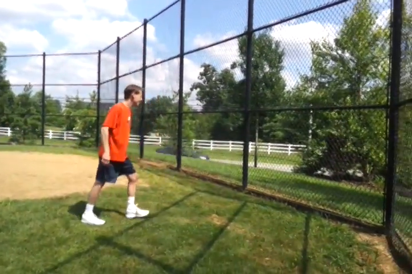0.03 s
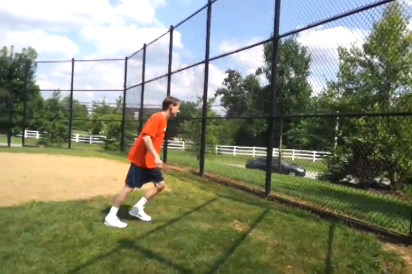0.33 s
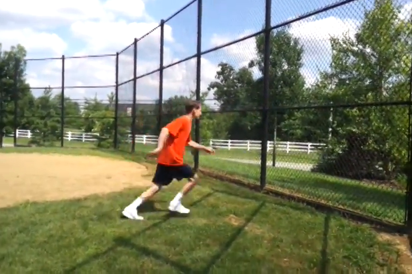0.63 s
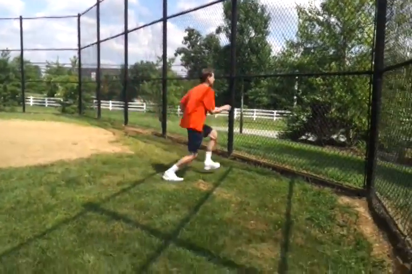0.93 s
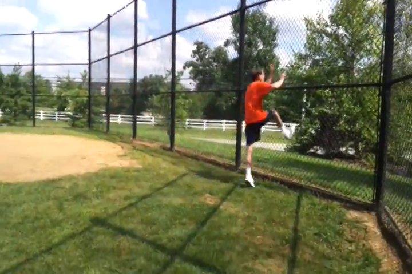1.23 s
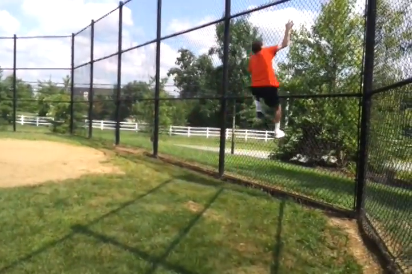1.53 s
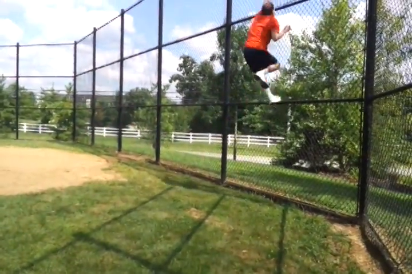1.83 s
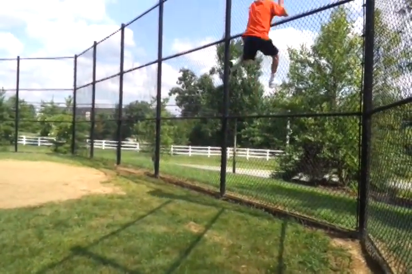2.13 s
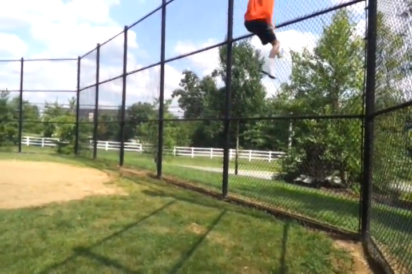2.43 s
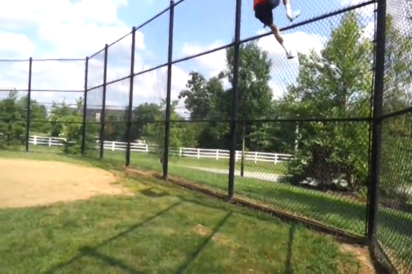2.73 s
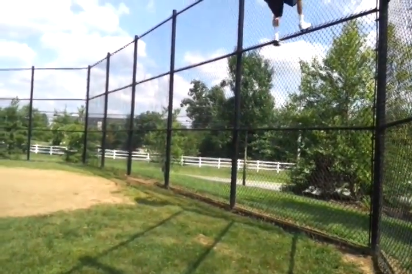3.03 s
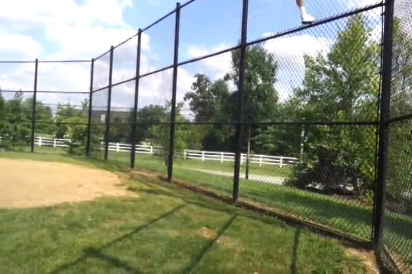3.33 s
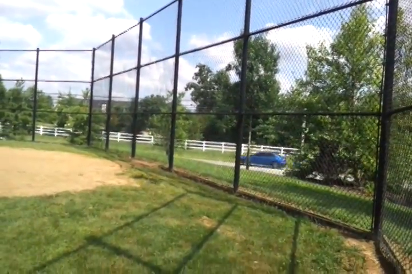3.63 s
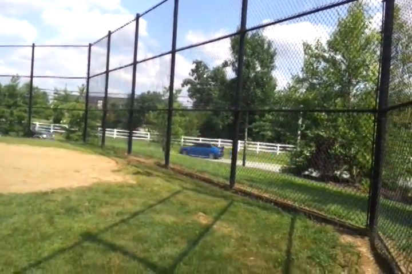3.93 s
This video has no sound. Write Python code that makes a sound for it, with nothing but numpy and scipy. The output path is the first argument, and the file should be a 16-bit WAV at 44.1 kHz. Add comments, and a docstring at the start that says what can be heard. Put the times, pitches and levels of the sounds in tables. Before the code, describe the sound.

A chain-link fence rattles and clinks as someone climbs it, with cars passing behind.

```python
"""Climbing a chain-link fence

Someone runs over grass and climbs a tall chain-link fence: each hold shakes the mesh, whose wires
clatter, clink and ring. Cars pass on the road behind, one with a low engine drone, and distant
traffic hums throughout. A few dry clicks, a faint ticking and a low rumble sound close to the
hand-held mono microphone."""
import sys
import numpy as np
from scipy import signal
from scipy.fft import rfft, irfft, next_fast_len
from scipy.io import wavfile
from scipy.ndimage import map_coordinates

SR = 44100
rng = np.random.default_rng(int(sys.argv[2]) if len(sys.argv) > 2 else 0)


def wrap_up_sound(samples):
    """Save the sound to the file named by the first command line argument, as 16-bit audio."""
    columns = np.atleast_2d(samples).T
    # keep every value between -1 and 1, then stretch to whole-number steps
    tamed = np.clip(columns, -1, 1)
    steps = np.round(tamed * 32767).astype(np.int16)
    wavfile.write(sys.argv[1], SR, steps)


N = 176400
T = np.arange(N) / SR


def amp(db):
    """Decibels to gain."""
    return 10 ** (np.asarray(db) / 20)


def unit(x):
    """Scale to rms 1."""
    return x / np.sqrt(np.mean(x ** 2) + 1e-20)


def curves(rows):
    """One automation curve for each column after the time."""
    times, *columns = np.transpose(rows)
    return [np.interp(T, times, column) for column in columns]


def wobble(rate):
    """A smooth random curve, rate knots a second."""
    return map_coordinates(rng.standard_normal(400), [T * rate], mode="mirror")


def colour(x, spectrum):
    """Minimum-phase EQ through (freq_hz, gain_db) points."""
    size = 2 * next_fast_len(len(x))
    hz, db = np.transpose(spectrum)
    gain_db = np.interp(np.log(np.fft.rfftfreq(size, 1 / SR) + 1), np.log(hz), db)
    cepstrum = irfft(np.log(amp(gain_db)))
    cepstrum[1:size // 2] *= 2  # folded so that nothing rings ahead of an attack
    cepstrum[size // 2 + 1:] = 0
    return irfft(rfft(x, size) * np.exp(rfft(cepstrum)))[:len(x)]


def noise(spectrum):
    """Coloured noise of rms 1."""
    return unit(colour(rng.standard_normal(N), spectrum))


def fade(t60):
    """A third of a second of exponential decay."""
    return np.exp(-np.log(1000) * T[:SR // 3] / t60)


def burst(spectrum, t60):
    """A dying burst of coloured noise; energy 1."""
    decay = fade(t60)
    x = colour(decay * rng.standard_normal(len(decay)), spectrum)
    return x / np.linalg.norm(x)


def impact(spectrum, t60, scatter=.55):
    """One sharp contact with a short scattered tail, coloured; energy 1."""
    tail = fade(t60) * rng.standard_normal(SR // 3)
    x = colour(signal.unit_impulse(len(tail)) + scatter * tail / np.linalg.norm(tail), spectrum)
    return x / np.linalg.norm(x)


def contacts(per_s, spread_db=2.5):
    """Random impulses of uneven size, rms 1."""
    hits = (rng.random(N) < per_s / SR) * rng.choice([-1, 1], N)
    return unit(hits * amp(spread_db * rng.standard_normal(N)))


def add(out, start_s, x):
    """Mix x in at start_s."""
    part = out[round(start_s * SR):][:len(x)]
    part += x[:len(part)]


def traffic():
    """Distant traffic blends into a low, gently swelling hum."""
    # swell of the hum: time_s, level_db
    swell = [(0, -35.5), (1.0, -36.5), (1.85, -33.5), (2.7, -36), (4, -35.5)]
    # tone of the hum: freq_hz, gain_db
    hum_eq = [(20, -14.5), (45, -6), (75, 1), (130, -2), (180, -3), (228, 0), (300, -5.5), (450, -9.5),
              (600, -16.5), (900, -10.5), (1300, -15.5), (2000, -22.5), (3500, -26), (5000, -39),
              (6500, -42), (8000, -81.5)]
    return amp(curves(swell)[0] + 0.11 * wobble(5.0)) * noise(hum_eq)


def tyres():
    """Tyres roar on the road, brightening as a car comes near."""
    # pass-by levels of the two bands: time_s, low_db, high_db
    pass_by = [(0, -51.5, -53), (.85, -57, -48), (1.1, -47.5, -43), (1.23, -36.5, -43.5),
               (1.48, -38, -39.5), (1.65, -38, -38.5), (1.95, -38.5, -36.5), (2.25, -36.5, -33.5),
               (2.45, -38.5, -34), (2.7, -42, -41.5), (3.0, -45, -45.5), (3.3, -56, -47.5), (4, -42, -46.5)]
    # body of the roar: freq_hz, gain_db
    low_eq = [(200, -19), (400, 0.5), (600, -13.5), (780, 4.5), (950, 13.5), (1300, 6.5), (1800, 0.5),
              (2600, -46)]
    # hiss of the tread: freq_hz, gain_db
    high_eq = [(700, -19.5), (1200, -2.5), (1650, -7), (2100, -5.5), (2600, -14.5), (3400, -15.5),
               (5000, -22.5), (7500, -44.5)]
    low_db, high_db = curves(pass_by)
    return amp(0.41 * wobble(12)) * (amp(low_db) * noise(low_eq) + amp(high_db) * noise(high_eq))


def engine(waver_db=1):
    """An approaching car drones on one low note, the firing rate of its engine."""
    # course of the drone: time_s, firing_hz, level_db
    drone = [(0, 70.5, -47), (1, 69, -53.5), (1.35, 69.1, -41.5), (1.6, 70.2, -48), (2, 69.6, -42),
             (2.3, 68.75, -36), (2.55, 68.4, -38.5), (2.8, 68.8, -33.5), (3.2, 67.4, -33),
             (3.65, 66, -31.5), (4, 65.7, -33.5)]
    hz, db = curves(drone)
    return np.sqrt(2) * amp(db + waver_db * wobble(24)) * np.sin(2 * np.pi * np.cumsum(hz) / SR)


def rumble(fade_s=0.0066):
    """Lumpy low rumble that comes and goes at the microphone."""
    # stretches of rumble: start_s, end_s, level_db
    stretches = [(0.125, 0.162, -33), (0.418, 0.524, -32.5), (0.533, 0.687, -32.5), (0.702, 0.918, -36.5),
                 (1.886, 1.939, -34.5)]
    # tone of the rumble: freq_hz, gain_db
    rumble_eq = [(25, -12.5), (90, 5), (170, 0.5), (230, 7.5), (330, -7.5), (480, -11.5), (800, -57.5)]
    gate = sum(amp(db) * np.clip(np.minimum(T - start, end - T) / fade_s + .5, 0, 1)
               for start, end, db in stretches)
    return gate * unit(noise(rumble_eq) * amp(.5 * wobble(28.86)))


def ticking():
    """Tiny dry ticks of uneven strength."""
    # tick cues: start_s, level_db
    ticks = [(.018, -27), (.211, -27), (.289, -24.5), (.355, -24.5), (.421, -26), (.488, -23), (.555, -27),
             (0.622, -25), (0.752, -22.5), (.788, -25), (1.175, -21.5), (1.344, -17), (1.67, -22),
             (3.316, -23.5), (3.349, -22.5)]
    # thin, bright tone of a tick: freq_hz, gain_db
    tick_eq = [(2000, -16), (3000, -5), (3900, 0), (5000, -10), (7000, -28)]
    tick = colour(signal.unit_impulse(SR // 20), tick_eq)
    out = np.zeros(N)
    for start_s, db in ticks:
        add(out, start_s, amp(db) * tick / np.linalg.norm(tick))
    return out


def clicks(second_contact_s=.0038, thud_lag_s=.0008):
    """Dry double clicks, each contact a snap over a knock, with a dull thud just behind."""
    # click cues: start_s, snap_db, knock_db, thud_db, second_contact_relative_db
    cues = [(0.8773, -5.5, -35, -3.5, -20), (0.9048, -13, -13.5, -35, -9), (1.9662, -11.5, -26, -19, -15),
            (3.3872, -8.5, -5, -16, -3.5), (3.8334, -9.5, -6, -3, -5), (3.9838, -11.5, -9, -15, -4)]
    # bright snap: freq_hz, gain_db
    snap_eq = [(1500, -29), (2300, -14), (2700, -1), (3100, -0.5), (3650, 9), (4200, 2), (4750, 2.5),
               (5300, -18), (5900, -11), (8000, -25)]
    # midrange knock: freq_hz, gain_db
    knock_eq = [(250, -10), (480, 2), (780, 4), (1100, -4), (1600, -4), (2200, -1.5), (3200, -13),
                (6000, -44)]
    # low thud: freq_hz, gain_db
    thud_eq = [(30, -13), (100, -3.5), (250, 1.5), (450, -4.5), (1000, -25), (3000, -49)]
    out = np.zeros(N)
    for start_s, snap_db, knock_db, thud_db, second_db in cues:
        for contact_s, drop_db in (start_s, 0), (start_s + second_contact_s, second_db):
            snap = amp(snap_db + drop_db) * impact(snap_eq, t60=.0074)
            knock = amp(knock_db + drop_db) * impact(knock_eq, t60=.02)
            thud = amp(thud_db + drop_db) * impact(thud_eq, t60=.02)
            add(out, contact_s, snap + knock)
            add(out, contact_s + thud_lag_s, thud)
    return out


def grass_steps():
    """Short crisp swishes: many blades of grass snap past the shoes."""
    # shoes brushing the grass: centre_s, level_db, width_s
    swishes = [(0.961, -53, 0.042), (1.064, -47, 0.0092), (1.093, -39.5, 0.0089), (1.102, -37.5, 0.0024)]
    # tone of the blades: freq_hz, gain_db
    grass_eq = [(800, -23), (2300, -3), (2850, 1), (3500, -4), (5000, -9), (6500, -13.5), (7500, -19)]
    blades = unit(colour(contacts(per_s=1500), grass_eq))
    return blades * sum(amp(db) * np.exp(-.5 * ((T - centre) / width) ** 2)
                        for centre, db, width in swishes)


def clinks():
    """Single wires and loose fittings strike the rails, each with one clear note."""
    # strikes on the rails: start_s, level_db, pitch_hz, t60_s
    strikes = [(1.372, -40.5, 3235, 0.28), (1.378, -44, 4590, 0.18), (1.80, -44, 3290, .3),
               (1.966, -29, 3950, .03), (2.16, -46, 4600, 0.18), (2.499, -22, 3237, 0.07),
               (2.507, -28, 3220, 0.06), (2.525, -25, 3250, 0.073), (2.544, -37, 4580, 0.27),
               (2.925, -30.5, 3520, 0.095), (2.929, -30.5, 5740, 0.053), (2.945, -37, 4690, 0.17),
               (2.993, -28, 4660, 0.076), (2.997, -32, 5440, 0.045), (3.112, -34.5, 5020, .06),
               (3.221, -38.5, 4550, .1), (3.510, -31.5, 5000, 0.062), (3.539, -30.5, 4720, 0.042),
               (3.548, -37, 4000, 0.029)]
    out = np.zeros(N)
    for start_s, db, hz, t60 in strikes:
        decay = fade(t60)
        note = np.sin(2 * np.pi * hz * rng.normal(1, 0.0022) * T[:len(decay)])
        add(out, start_s, amp(db) * decay * note)
    return out


def wire_ring(t60=.29, detune=.0023):
    """The ring of one patch of mesh, slightly out of tune with the others; energy 1."""
    # modes of the wires: pitch_hz
    mode_hz = [1712, 1978, 2146, 3245, 3508, 3660, 4020, 4377, 4581, 4650, 4802, 4981, 5190, 5648, 5803]
    # balance of those modes: level_db
    mode_db = [-7, -1, -3, 2, -2, -4, -4, -6, 4, 3, -2, 0, -6, -8, -9]
    decay = fade(t60)
    t = T[:len(decay)]
    ring = np.zeros(len(t))
    for hz, db in zip(mode_hz, mode_db):
        gain = amp(db + rng.normal(0, 1.2))
        cycles = hz * rng.normal(1, detune) * t + rng.random()
        ring += gain * decay * np.sin(2 * np.pi * cycles)
    return ring / np.linalg.norm(ring)


def fence(patches=7, contacts_per_s=1400, rise_s=.011, ring_db=-3, jingle_ring_db=-3):
    """Each shake sets off a dying swarm of wire contacts that clash, ring and rattle the frame."""
    # shakes of the mesh: start_s, level_db, decay_s, frame_relative_db
    shakes = [(1.368, -41, 0.03, 2), (1.49, -50, 0.026, -7), (1.66, -54, 0.0095, -2),
              (1.80, -47, 0.039, 11), (2.143, -34.5, .04, 2.5), (2.184, -47, 0.037, 11),
              (2.386, -43, 0.026, 3), (2.478, -35.5, .01, 2), (2.487, -30, 0.016, 3),
              (2.522, -34, 0.046, 3), (2.621, -32.5, 0.005, 0), (2.697, -40.5, 0.0091, -0.5),
              (2.845, -45.5, 0.086, 4.5), (2.915, -29, 0.023, -3), (2.983, -33.5, 0.016, -8),
              (3.041, -46.5, .025, 6), (3.099, -39.5, 0.016, 1), (3.21, -45.5, 0.0083, 1),
              (3.429, -40, .006, 2), (3.442, -37.5, 0.017, 2.5), (3.499, -34, 0.0088, -2.5),
              (3.531, -36, 0.014, -3), (3.635, -40.5, 0.014, 1.5), (3.929, -36, .012, 3),
              (3.941, -34, 0.0065, -13)]
    # loose mesh jingling under the climber: time_s, level_db
    jingle = [(0, -63.5), (1.2, -52.5), (1.4, -48), (1.62, -51.5), (1.9, -46.5), (2.25, -46), (2.55, -51),
              (2.8, -50.5), (3.05, -48), (3.3, -52), (3.6, -51), (3.8, -57), (4, -51)]
    # wire clashing on wire: freq_hz, gain_db
    clash_eq = [(1500, -23), (2500, -3), (3400, 0.5), (4000, 3.5), (4250, -0.5), (4700, 0), (5400, -2),
                (6100, -7.5), (7000, -16), (8000, -65.5)]
    # rattling frame: freq_hz, gain_db
    frame_eq = [(120, -25), (280, 7), (450, -0.5), (590, -7), (750, 5), (1150, -0.5), (1600, -2.5),
                (2050, 2), (2450, -10.5), (4000, -31.5)]
    jingle_power = amp(curves(jingle)[0]) ** 2
    shake_power, frame_power, out = np.zeros((3, N))
    age = T[:SR // 2]
    for start_s, db, decay_s, frame_db in shakes:
        shake = amp(db) * np.minimum(age / rise_s, 1) * np.exp(-np.maximum(age - rise_s, 0) / decay_s)
        add(shake_power, start_s, shake ** 2)
        add(frame_power, start_s, (amp(frame_db) * shake) ** 2)
    ring_power = amp(ring_db) ** 2 * (shake_power + amp(jingle_ring_db) ** 2 * jingle_power)
    for _ in range(patches):
        hits = contacts(contacts_per_s / patches)  # the same hits drive all three layers
        layers = [(shake_power + jingle_power, burst(clash_eq, t60=.018)),
                  (ring_power, wire_ring()),
                  (frame_power, burst(frame_eq, t60=.096))]
        for power, response in layers:
            out += signal.fftconvolve(hits * np.sqrt(power / patches), response)[:N]
    return out


def scene():
    """Everything reaches one microphone in the open air."""
    foreground = fence() + clinks() + clicks() + ticking() + grass_steps()
    background = tyres() + engine() + traffic() + rumble()
    mono = foreground + background
    return np.array([mono, mono])


def record(dry, top_hz=7500):
    """A steep low-pass takes the top treble off the mix."""
    return signal.sosfilt(signal.ellip(10, .1, 90, top_hz, fs=SR, output="sos"), dry)


dry = scene()
out = record(dry)
wrap_up_sound(out)
```